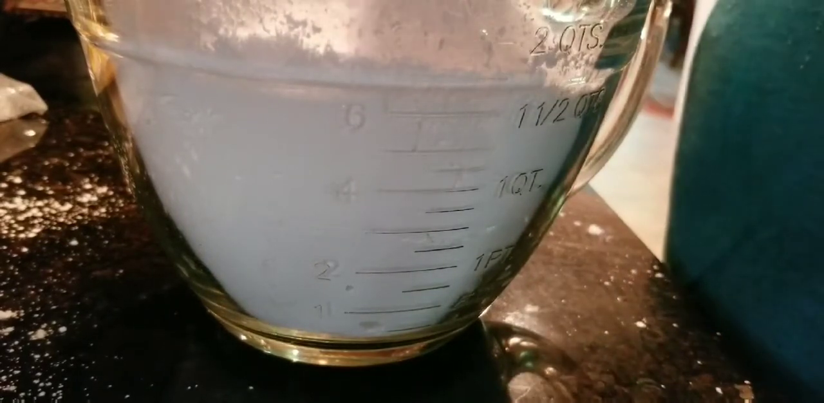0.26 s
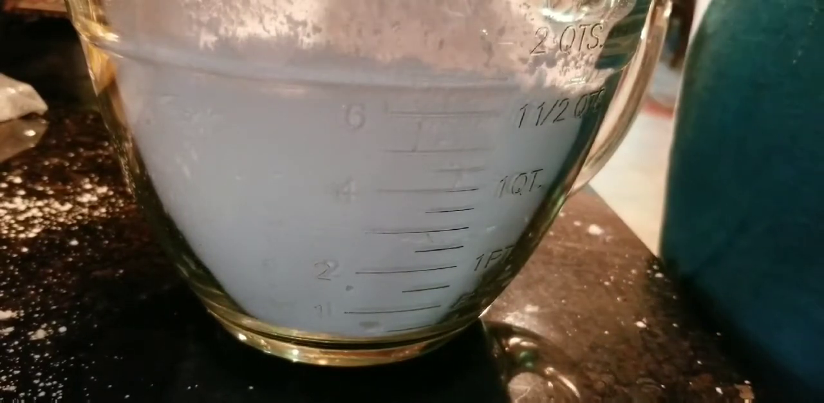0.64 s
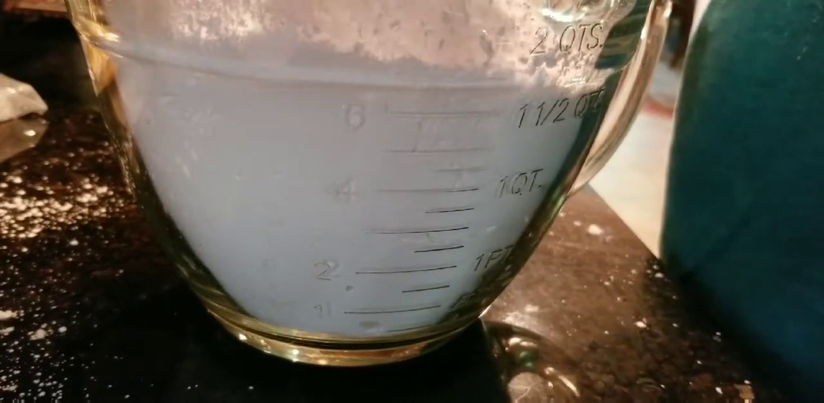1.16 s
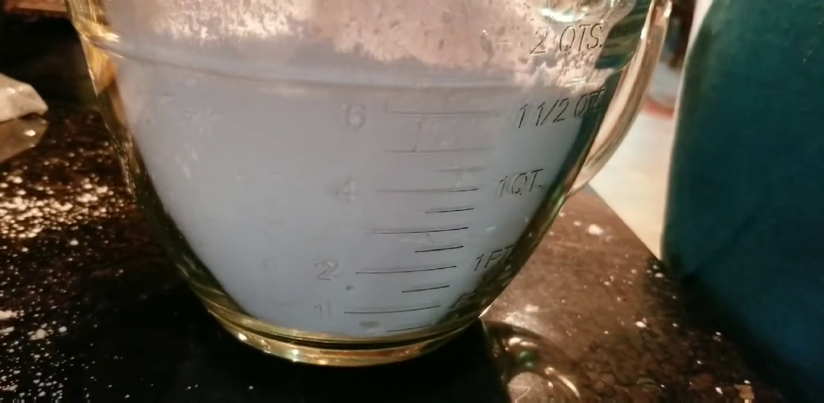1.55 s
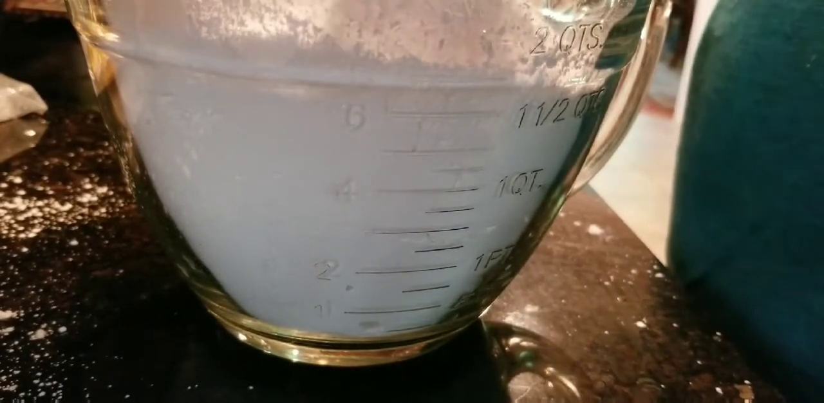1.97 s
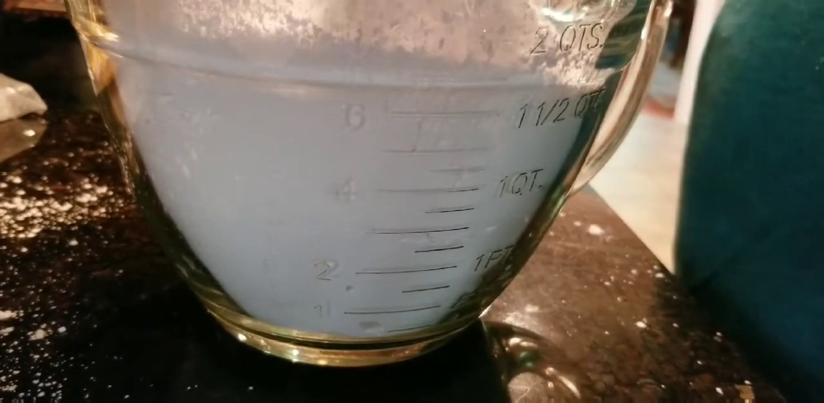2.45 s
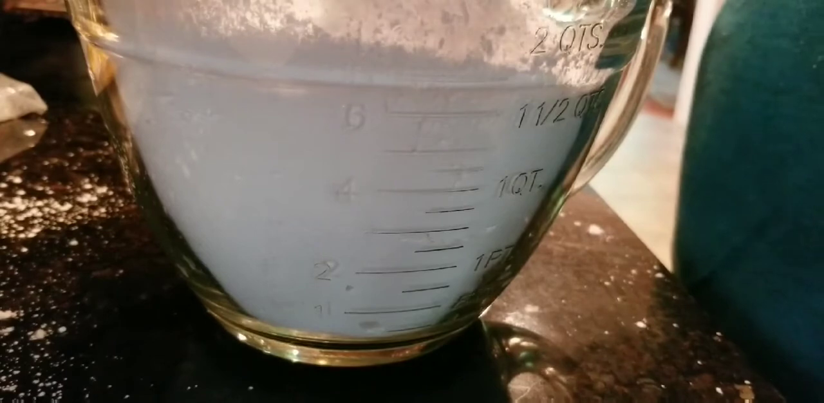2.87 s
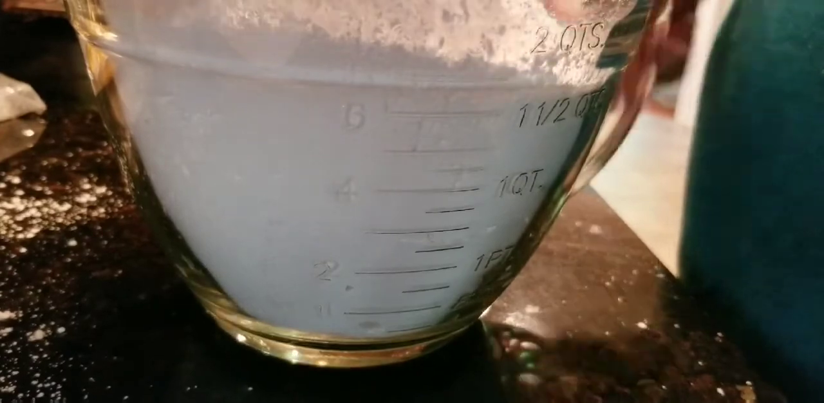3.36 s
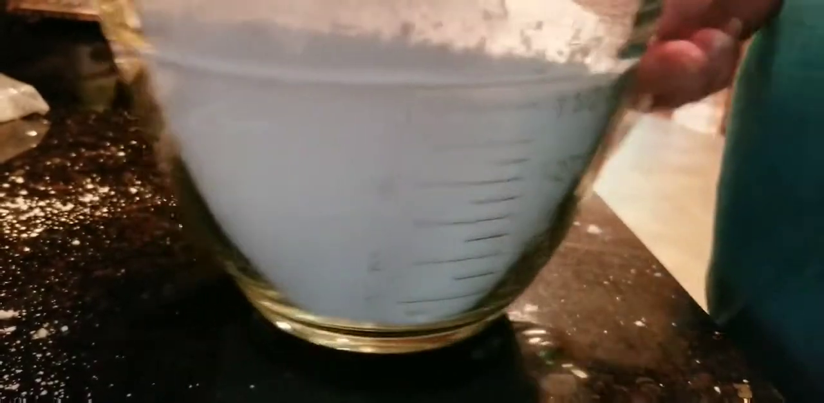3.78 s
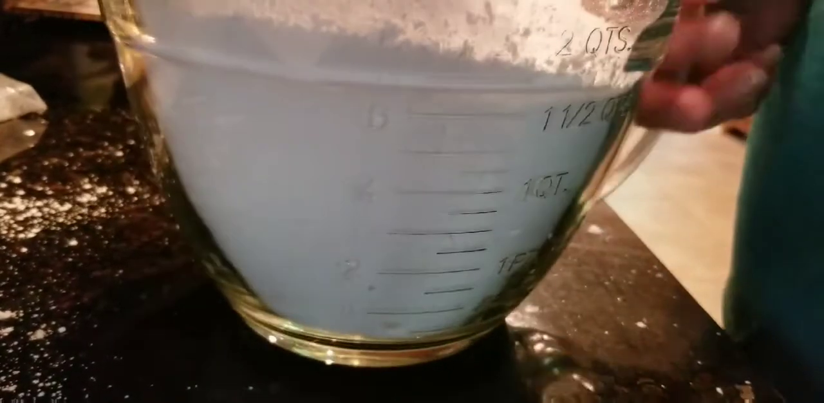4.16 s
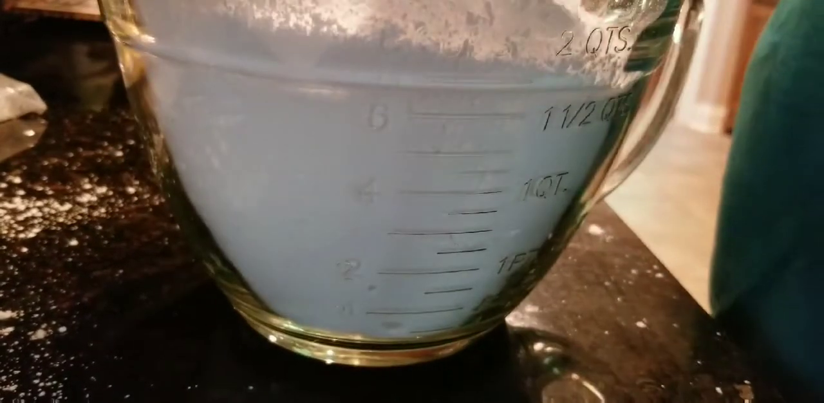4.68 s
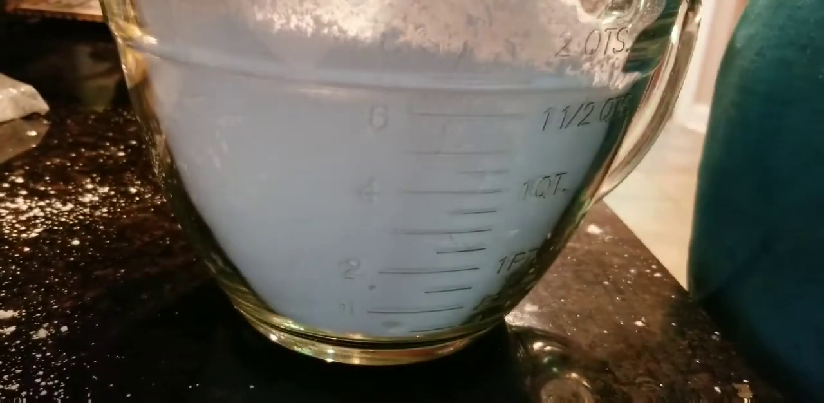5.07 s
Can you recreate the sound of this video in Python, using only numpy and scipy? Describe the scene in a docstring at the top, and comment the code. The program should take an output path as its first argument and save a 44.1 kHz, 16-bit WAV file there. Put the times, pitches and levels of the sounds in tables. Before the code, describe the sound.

Irregular runs of dry, tinny clicks and brief mesh scrapes come several times a second from a squeezed sifter, pause briefly, resume, then stop. A dense cluster of hard, woody-glassy bowl knocks on the counter follows with a faint grain rustle. Near the end the sifter snaps again. Close small microphone, thin bass, quiet low hum and hiss, reflective kitchen.

```python
"""Scraping rasps and sharp tinny snaps: a squeeze-handle sifter worked over a glass bowl of powdered sugar.
Each squeeze drags the wire agitator over the mesh (swelling grit noise) while the handle linkage clicks (short
bursts); both excite the cup's resonances. Between squeezes a hand shifts the bowl, which knocks on a stone
counter: rough noise bursts plus decaying modes, with a faint rustle of grains. An appliance hums under it all
(wavering sines over room noise), and the kitchen adds reverberation."""
import sys
import numpy as np
from scipy import signal
from scipy.fft import rfft, irfft
from scipy.io import wavfile

SR = 44100
rng = np.random.default_rng(int(sys.argv[2]) if len(sys.argv) > 2 else 0)


def generate_wav(sig):
    """Save sig (samples, or channels by samples) to the path in sys.argv[1] as 16-bit PCM at SR."""
    pcm = np.round(np.clip(np.atleast_2d(sig).T, -1, 1) * 32767).astype(np.int16)
    wavfile.write(sys.argv[1], SR, pcm)


N = 235217
TINY = 1e-18   # keeps silent filter inputs from reaching exact zero


def from_db(db):
    """Gain of a level in dB."""
    return 10 ** (np.asarray(db) / 20)


def rms_one(x):
    """Scaled to rms 1."""
    return x / np.sqrt(np.mean(x ** 2) + 1e-20)


def at_hz(points, hz):
    """A table read on a log-frequency axis."""
    table = np.array(points)
    return np.interp(np.log(hz), np.log(table[:, 0]), table[:, 1])


def coloured(x, spectrum):
    """Noise given a spectrum; rms 1."""
    hz = np.maximum(np.fft.rfftfreq(N, 1 / SR), 1)
    return rms_one(irfft(rfft(x) * from_db(at_hz(spectrum, hz)), N))


def filtered(x, order, hz, kind):
    """Butterworth filter."""
    return signal.sosfilt(signal.butter(order, hz, kind, fs=SR, output="sos"), x)


def resonate(x, hz, width_hz):
    """A resonance with gain 1 on top."""
    r = np.exp(-np.pi * width_hz / SR)
    numerator = (1 - r * r) / 2 * np.array([1, 0, -1])
    return signal.lfilter(numerator, [1, -2 * r * np.cos(2 * np.pi * hz / SR), r * r], x)


def envelope(rows, db, edge_s):
    """Gain along a table's times, linear in dB, faded to silence at both ends."""
    t, s = np.arange(N) / SR, np.transpose(rows)[0]
    edges = np.clip(np.minimum(t - s[0], s[-1] - t) / edge_s, 0, 1)
    return edges * from_db(np.interp(t, s, db))


def bursts(times_s, levels_db, t60s, rise_s):
    """Envelope of sudden contacts that die away exponentially."""
    out = np.zeros(N)
    for s, db, t60 in zip(times_s, levels_db, np.clip(t60s, .003, .3)):
        i = round(s * SR)
        t = np.arange(min(round(1.5 * t60 * SR), N - i)) / SR
        decay = from_db(db - 60 * t / t60)
        out[i:i + len(t)] += decay * (1 - np.exp(-t / rise_s))
    return out


def grains(per_s, spread_db):
    """Random tiny impacts of uneven size and random sign; rms 1."""
    sizes = from_db(spread_db * np.minimum(rng.exponential(1, N), 4))
    signs = rng.choice([-1, 1], N)
    return rms_one(sizes * signs * (rng.random(N) < per_s / SR))


CLUMPS_HZ = 70   # top rate of the unevenness


def clumps(depth_db):
    """Gain of sugar that moves in clumps: slow noise in dB; rms 1."""
    slow = filtered(rng.standard_normal(N), 2, CLUMPS_HZ, "low")
    return rms_one(from_db(depth_db * rms_one(slow)))


BANDS_FROM_HZ = 94


def in_bands(noise, envelopes, low_hz, high_hz):
    """Low, middle and high part of a noise, each under its own envelope; deep bass is filtered off."""
    out = 0
    bands = ((low_hz, "low"), ([low_hz, high_hz], "band"), (high_hz, "high"))
    for gain, (hz, kind) in zip(envelopes, bands):
        band_rms = np.std(filtered(noise, 4, hz, kind))
        out = out + filtered(gain * noise + TINY, 4, hz, kind) / band_rms
    return filtered(out, 2, BANDS_FROM_HZ, "high")


# Room noise spectrum. Each row: frequency in Hz, relative level in dB per Hz.
AIR_SPECTRUM = [(15, -61), (25, -31), (46, -5.5), (70, -8), (85, -18), (126, -8), (165, -13), (198, -0.5),
                (238, -24.5), (292, -10), (398, -10.5), (421, -28.5), (479, -11.5), (506, -19), (2000, -58),
                (2600, -93.5), (4400, -120)]
AIR_RMS_DB = -60.0
# Hum partials. Each row: frequency in Hz, amplitude of the steady sine in dB.
HUM_PARTIALS = [(59.2, -64), (118.4, -71.5), (193.8, -60.5), (290.7, -78), (473.7, -77)]


def appliance():
    """Hum partials, each a steady sine plus a narrow band of noise that makes it waver, over broad room noise."""
    t = np.arange(N) / SR
    out = from_db(AIR_RMS_DB) * coloured(rng.standard_normal(N), AIR_SPECTRUM)
    for hz, db in HUM_PARTIALS:
        # one extra second lets the resonance settle
        waver = rms_one(resonate(rng.standard_normal(N + SR), hz, width_hz=3.0)[SR:])
        steady = np.sin(2 * np.pi * (hz * t + rng.random()))
        out += from_db(db) * (steady + 0.55 * waver)
    return out


# Reverberation times. Each row: frequency in Hz, t60 in seconds.
KITCHEN_T60 = [(100, 0.33), (300, 0.45), (1000, 0.69), (3000, 0.54), (7000, 0.5), (14000, .42)]


def kitchen(x):
    """Reverberation: roughly octave bands of noise, each dying at its own rate, with a short build-up."""
    t, tail = np.arange(SR) / SR, 0
    for low_hz in 60 * 2.0 ** np.arange(8):
        band = filtered(rng.standard_normal(SR), 2, [low_hz, 2.2 * low_hz], "band")
        t60 = at_hz(KITCHEN_T60, 1.5 * low_hz)
        tail = tail + band * from_db(-60 * t / t60) / np.sqrt(t60)
    tail *= 1 - np.exp(-t / 0.002)
    unit_energy = tail / np.sqrt(np.sum(tail ** 2))
    return signal.fftconvolve(x, unit_energy)[:N]


# Faint bright rustle while the hand moves the bowl. Each row: time in seconds, level in dB.
RUSTLE_LEVELS = [(3.469, -84), (3.58, -65), (3.722, -65), (3.93, -86.5), (4.28, -78), (4.351, -101)]
# Its spectrum. Each row: frequency in Hz, relative level in dB per Hz.
RUSTLE_SPECTRUM = [(1470, -36.5), (2500, 3), (2790, -16), (3550, -6.5), (4880, -11), (6300, -9.5),
                   (7470, -0.5), (9080, -11), (9810, -7.5), (14900, -8.5), (16000, -9.5)]


def rustle():
    """Fine grains slipping: many equal tiny impacts, coloured, in clumps."""
    level = envelope(RUSTLE_LEVELS, np.array(RUSTLE_LEVELS)[:, 1], edge_s=0.014)
    slips = coloured(grains(per_s=4700, spread_db=0.0), RUSTLE_SPECTRUM)
    return level * clumps(depth_db=1.5) * slips


COUNTER_TOP_HZ, MIDDLE_FROM_HZ, GLASS_FROM_HZ = 100, 850, 3000
# Crack of glass on stone. Each row: frequency in Hz, relative level in dB per Hz.
CRACK_SPECTRUM = [(59, -36), (100, -11), (146, 9.5), (246, -20), (291, 2), (546, 5), (646, 4), (1350, -5),
                  (1590, -8.5), (1770, -9), (1960, -8.5), (2600, -19), (3600, -23.5), (8000, -35.5),
                  (12500, -37), (16000, -47.5)]


def crack(s, db, middle_db, treble_db):
    """Short rough contact noise, then a weaker, longer shudder of the loaded counter, in three bands."""
    t60, shudder_s = np.full(len(s), .035), np.full(len(s), .25)
    dull = bursts(s, db - 5.5, t60, rise_s=0.0018)
    dull = dull + bursts(s, db - 31.0, shudder_s, rise_s=.004)
    hard = bursts(s, db + middle_db - 8.5, 1.3 * t60, rise_s=.0004)
    hard = hard + bursts(s, db + middle_db - 26.5, 1.5 * shudder_s, rise_s=0.0023)
    bright = bursts(s, db + treble_db - 5.0, 0.6 * t60, rise_s=0.001)
    bright = bright + bursts(s, db + treble_db - 25.0, 0.27 * shudder_s, rise_s=.003)
    noise = coloured(rng.standard_normal(N), CRACK_SPECTRUM)
    return in_bands(noise, (dull, hard, bright), MIDDLE_FROM_HZ, GLASS_FROM_HZ)


# Modes of counter, bowl and rim. Each row: frequency in Hz, relative level in dB, t60 in seconds.
BOWL_MODES = [(79.5, -2.5, 0.33), (144, -22, 0.12), (179.3, -14.5, .1), (361.3, -11, 0.066),
              (557, -11.5, 0.066), (820, -19.5, 0.14), (1064, -13, .1), (1339, -16, 0.17),
              (1821, -14.5, 0.09), (2174, -16, 0.064), (2320, -30, 0.1), (3420, -10.5, 0.08),
              (4720, -12, 0.16), (5800, -14.5, 0.07), (7360, -14.5, 0.11), (7680, -16, 0.091),
              (7950, -11, 0.15), (9100, -22.5, 0.11), (10350, -23, .1), (11200, -25.5, 0.12),
              (11880, -17.5, .1), (12000, -16.5, .1)]
PAIR_SPLIT = 0.0027   # relative spacing: an uneven bowl splits each mode into two that beat
BLOW_SPREAD_DB = 2.9   # standard deviation of each mode's level from knock to knock


def bowl_ring(s, db, middle_db, treble_db, thud_db):
    """Each knock pushes pairs of damped modes, with a force that swells and fades over about one cycle."""
    out = np.zeros(N)
    at = (s * SR).round().astype(int)
    spread = rng.normal(0, 1, (len(s), 2 * len(BOWL_MODES)))
    pairs = [(hz * (1 + side * PAIR_SPLIT), *rest) for hz, *rest in BOWL_MODES for side in (-.5, .5)]
    for k, (hz, mode_db, ring_s) in enumerate(pairs):
        part = np.searchsorted([COUNTER_TOP_HZ, MIDDLE_FROM_HZ, GLASS_FROM_HZ], hz)
        part_db = (thud_db, 0, middle_db, treble_db)[part]
        blows = np.full(N, TINY)
        blows[at] = from_db(db + part_db + mode_db + BLOW_SPREAD_DB * spread[:, k])
        push = np.hanning(round(SR / hz) + 3)
        force = signal.oaconvolve(blows, push / push.sum())[:N]
        r, w = from_db(-60 / (max(ring_s, .005) * SR)), 2 * np.pi * hz / SR
        out += signal.lfilter([0, np.sin(w)], [1, -2 * r * np.cos(w), r * r], force)
    return out


# Bowl against counter. Each row: time in seconds, relative level in dB, then against that level:
# middle in dB, treble in dB, counter thud in dB.
KNOCKS_TABLE = [(1.32, -44, -21.5, -30.5, -19.5), (3.522, -22, -18.5, -38, -11.5),
                (3.591, -23.5, -15.5, -34.5, -15), (3.662, -33, -21.5, -44, -11.5),
                (3.679, -21, -17, -46, -10), (3.722, -8, -6.5, -43, -20),
                (3.728, -11.5, -7.5, -15.5, -32.5), (3.731, -14.5, -9, -29.5, -19),
                (3.744, -9, -8, -17, -11), (3.75, -11.5, 2, -22, -19.5), (3.757, -25.5, -6, -20.5, -10),
                (3.764, -36, -9, -34.5, -12.5), (3.805, -48, 8, -24, 2), (3.924, -13, -2.5, -18.5, -34),
                (3.934, -16, -3, -25, -25), (3.951, -23.5, -37, -53, -7.5), (4.004, -25, -8, -35.5, -18),
                (4.099, -16, -7.5, -29, -33), (4.12, -26.5, -8.5, -46, -21.5)]
KNOCKS_FROM_HZ = 62   # high-pass corner of the knocks


def bowl():
    """Bowl rocking and knocking on the counter: a crack and shudder of noise, and modes that ring on."""
    s, db, middle_db, treble_db, thud_db = np.transpose(KNOCKS_TABLE)
    out = crack(s, db, middle_db, treble_db) + bowl_ring(s, db, middle_db, treble_db, thud_db)
    return filtered(out, 4, KNOCKS_FROM_HZ, "high")


# Agitator strokes over the mesh. Each row: start in seconds, loudest in seconds, fade start in seconds,
# relative rasp level in dB, body of the cup against rasp in dB, t60 of the run-out in seconds.
STROKES = [(0.0, 0.051, 0.099, -38, 5, 0.091), (0.265, 0.298, 0.32, -37.5, 6.5, 0.029),
           (0.37, 0.383, 0.4, -24, -4, 0.084), (0.585, .628, .67, -37, 3, 0.21),
           (0.787, .84, 0.8685, -38.5, 7, 0.056), (1.49, 1.506, 1.55, -38, -1, 0.15),
           (1.659, 1.726, 1.776, -30.5, 2.5, 0.022), (1.89, 1.952, 1.971, -25.5, -1, 0.16),
           (2.134, 2.165, 2.219, -30, 2, 0.074), (2.36, 2.406, 2.406, -26, 2, 0.18),
           (2.58, 2.637, 2.668, -29, 3.5, 0.12), (2.811, 2.838, 2.83, -40.5, 8, 0.061),
           (4.624, 4.706, 4.7, -42, 2, 0.027), (4.754, 4.768, 4.726, -19, -2, 0.14),
           (5.017, 5.064, 5.18, -38, -1, 0.025), (5.245, 5.264, 5.27, -32.5, 2, 0.098)]
STROKE_SWELL_DB, STROKE_EDGE_S = 22, 0.024   # growth from start to loudest; fade at both ends
BODY_FOLLOWS = 0.73   # share of the rasp's dB swell and fade that the body follows


def drag():
    """Rasp and body envelopes of the strokes: swell, hold in most strokes, then fade."""
    rasp = body = 0
    for start, loudest, fade, db, body_db, t60 in STROKES:
        rows = np.array([(start, -STROKE_SWELL_DB), (loudest, 0), (fade, 0), (fade + t60, -60)])
        shape_db = rows[:, 1]
        rasp = rasp + envelope(rows, db + shape_db, STROKE_EDGE_S)
        body = body + envelope(rows, db + body_db + BODY_FOLLOWS * shape_db, STROKE_EDGE_S)
    return rasp, body


# Sifter cup shifted faintly between runs of squeezes. Each row: start in seconds, loudest in seconds,
# end in seconds, relative rasp level in dB.
CUP_SHIFTS = [(0.968, 1.157, 1.48, -80), (2.9, 3.094, 3.4, -82.5)]
SHIFT_SWING_DB = 9


def shift_cup():
    """Envelope of the faint scrape of the moved cup: rises to its loudest, then falls."""
    swing_db = SHIFT_SWING_DB * np.array([-1, 0, -1])
    return sum(envelope(np.c_[s], db + swing_db, edge_s=.02) for *s, db in CUP_SHIFTS)


# Clicks of the handle linkage. Each row: time in seconds, relative level in dB, body against snap in dB, # top
# treble against snap in dB, t60 of the chatter in seconds.
SNAPS_TABLE = [(0.021, -42, 16, -24, 0.0071), (0.0525, -10, -6, -23, 0.011),
               (0.0593, -13.5, -13.5, -23, 0.019), (0.0744, -18, -2.5, -29, 0.052),
               (0.0932, -16.5, -12.5, -24, 0.067), (.2857, -43, 1.5, -19, 0.049),
               (0.3082, -30, 0, -14, 0.02), (.38, -23.5, 1, -10.5, 0.034),
               (0.3878, -15.5, -18.5, -7.5, 0.024), (0.4, -22, -25.5, -18, 0.011),
               (0.5965, -42, 13, -16, 0.029), (.6115, -39, -1.5, -18, 0.018),
               (.621, -25.5, 3, -17.5, 0.046), (0.6488, -11.5, -8, -30, 0.032),
               (0.664, -16, -10.5, -23.5, 0.042), (0.8536, -33.5, 3.5, -19, .032),
               (0.868, -31.5, 4.5, -23, 0.029), (0.9347, -43.5, 13, -10, .019),
               (1.0775, -32, 3.5, -40.5, 0.014), (1.19, -56, 6.5, -8.5, 0.019),
               (1.463, -68.5, 21.5, -8, 0.035), (1.4971, -25.5, 5.5, -23, 0.014),
               (1.511, -22, 0, -17, 0.025), (1.5609, -39, 3, -25, 0.024), (1.704, -26.5, -6, -16, 0.036),
               (1.733, -27, 4, -14, .014), (1.754, -16, -10, -20, 0.016), (1.9026, -33.5, -0.5, -19, 0.02),
               (1.914, -19.5, -5.5, -27, 0.042), (1.9329, -12, -7, -30, 0.03),
               (1.95, -11.5, -4.5, -19, 0.026), (1.9724, -18, -6, -23, 0.016),
               (1.997, -28.5, -3.5, -25, 0.023), (2.1576, -31, 1.5, -15, 0.033),
               (2.168, -18.5, -6, -23, 0.037), (2.3281, -51, 10, -14, .05), (2.369, -40.5, 8, -24, 0.02),
               (2.3914, -28.5, -4, -12, .023), (2.3945, -14, -13.5, -28, 0.078),
               (2.4014, -17.5, -5, -29.5, 0.033), (2.4179, -5, -23, -18.5, 0.021),
               (2.6289, -30.5, -6.5, -25, 0.013), (2.6447, -15.5, -6, -13, 0.019),
               (2.663, -42, 6, -19, 0.034), (2.6814, -25, -14, -19, 0.044), (2.838, -26, -4, -28, 0.02),
               (3.1293, -44, -3.5, -36, 0.083), (4.6354, -38.5, 2.5, -3, .023),
               (4.6602, -50, -8, -7, 0.032), (4.671, -43, -4, -24, 0.023), (4.683, -39.5, 15, -20, 0.017),
               (4.6942, -25, 3.5, -23, 0.021), (4.763, -14, -9.5, -17, 0.065),
               (4.795, -22.5, -11, -28, .044), (4.992, -34.5, 6, -20, 0.018), (5.0719, -29, -4, -30, 0.039),
               (5.1044, -29, 3.5, -20, .051), (5.131, -29, -8, -16, 0.029), (5.1488, -33, 1, -16, 0.017),
               (5.1833, -16.5, -10.5, -20, 0.017), (5.2648, -24, -5, -19, 0.029),
               (5.274, -29, -4, -7, 0.023), (5.2987, -37, 9.5, -15, 0.029)]
TOP_LASTS, BODY_LASTS = 1.9, 2.57   # t60 over that of the chatter


def snap():
    """Rasp, body and top envelopes of the snaps; the lows start later, lows and top outlast the chatter."""
    s, db, body_db, top_db, t60 = np.transpose(SNAPS_TABLE)
    rasp = bursts(s, db - 13.0, t60, rise_s=0.00033)
    body = bursts(s, db + body_db - 6.0, BODY_LASTS * t60, rise_s=0.0022)
    top = bursts(s, db + top_db, TOP_LASTS * t60, rise_s=.0003)
    return rasp, body, top


# Resonances of the tin cup. Each row: frequency in Hz, width in Hz before the minimum, relative level in dB.
CUP_MODES = [(206, 57.7, 2.5), (447, 235, -3), (902, 23, -7.5), (1930, 17, -28.5), (1810, 120, -45),
             (2215, 140, -4.5), (4356, 370, -8.5), (4350, 78, -20.5), (5067, 350, -12.5), (6340, 91, -17.5),
             (7200, 120, -31.5), (7660, 130, -16), (7830, 78, -15.5)]
MIN_WIDTH_HZ = 40   # narrowest width allowed, so no mode rings longer
BODY_TOP_HZ, TOP_FROM_HZ = 2450, 8500


def cup_ring(grit, body, rasp):
    """Grit drives the cup's resonances: low ones under the body envelope, high ones under the rasp."""
    out = np.zeros(N)
    for k, (hz, width_hz, mode_db) in enumerate(CUP_MODES):
        force = body * from_db(8.5) if hz < BODY_TOP_HZ else rasp * from_db(17.5)
        ring = resonate(force * grit + TINY, hz, max(width_hz, MIN_WIDTH_HZ))
        out += (-1) ** k * from_db(mode_db) * ring
    return out


# Grit on the mesh, heard directly. Each row: frequency in Hz, relative level in dB per Hz.
RASP_SPECTRUM = [(59, -24.5), (100, -25), (140, -25), (365, -2), (433, 0.5), (492, 1.5), (721, -6),
                 (1910, -12), (2580, -23.5), (7770, -12.5), (8830, -17.5), (10900, -11), (16000, -14)]


def sifter():
    """Grit noise under drags, snaps and cup shifts, heard directly and ringing in the tin cup."""
    drag_rasp, drag_body = np.array(drag()) * clumps(depth_db=2.5)   # sugar passes the mesh in clumps
    snap_rasp, snap_body, snap_top = snap()
    rasp = from_db(-14.0) * drag_rasp + shift_cup() + snap_rasp
    body = from_db(-3.5) * drag_body + snap_body
    top = from_db(-14.5) * drag_rasp + snap_top
    grit = grains(per_s=9000, spread_db=4.0)
    direct = in_bands(coloured(grit, RASP_SPECTRUM), (body, rasp, top), BODY_TOP_HZ, TOP_FROM_HZ)
    return from_db(-3.0) * direct + cup_ring(grit, body, rasp)


def scene():
    """Sifter and bowl close by, in the kitchen."""
    tin, glass = sifter(), bowl()
    echo = kitchen(from_db(-14.0) * tin + from_db(-12.5) * glass)
    return (tin + glass + rustle() + echo + appliance())[None]


# Microphone hiss. Each row: frequency in Hz, relative level in dB per Hz.
HISS_SPECTRUM = [(1180, -37.5), (2000, -9.5), (2180, -8.5), (3650, -22), (9920, -16), (12300, 3.5),
                 (15100, -4.5), (16000, -3.5)]
HISS_RMS_DB = -82   # before the top is cut
STOPBAND_HZ = 16600   # 60 dB down from here up


def record(dry):
    """The small microphone drops the deep bass and adds its hiss; the top is cut."""
    thin = filtered(dry, 4, 50.0, "high")
    hissing = thin + from_db(HISS_RMS_DB) * coloured(rng.standard_normal(N), HISS_SPECTRUM)
    return signal.sosfilt(signal.cheby2(12, 60, STOPBAND_HZ, fs=SR, output="sos"), hissing)


dry = scene()
out = record(dry)
generate_wav(out)
```